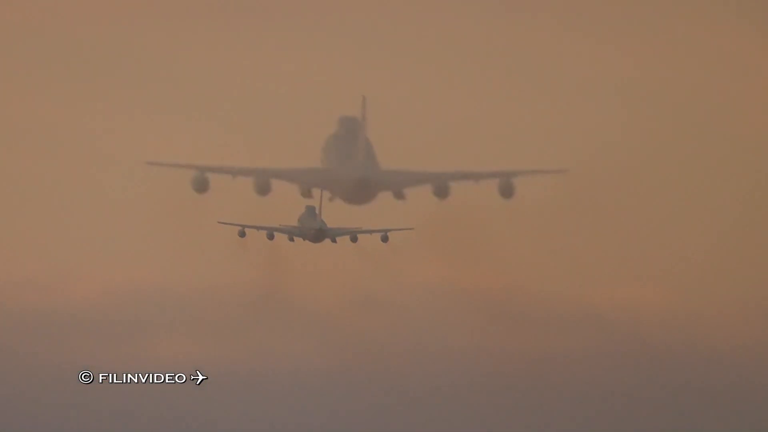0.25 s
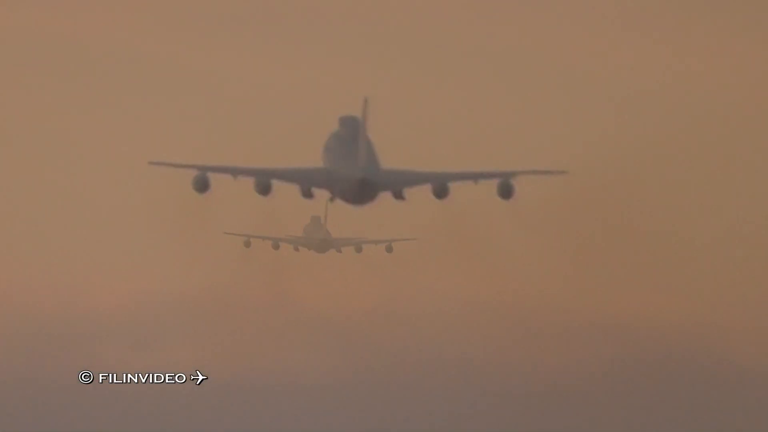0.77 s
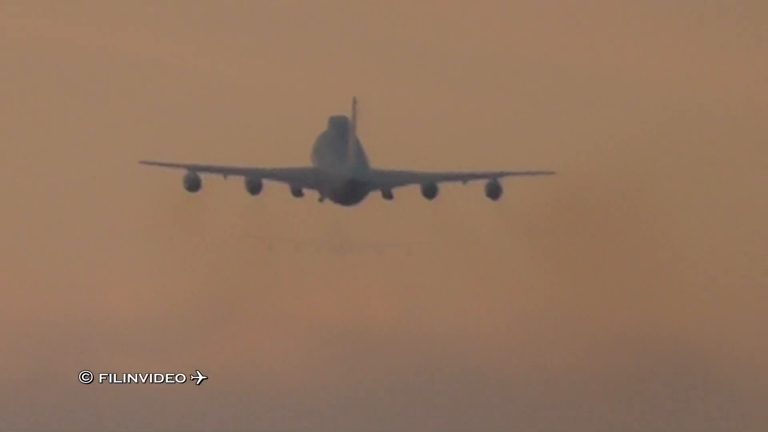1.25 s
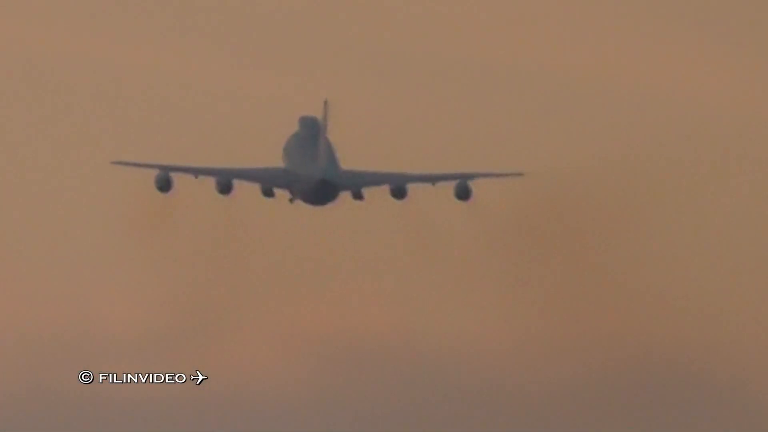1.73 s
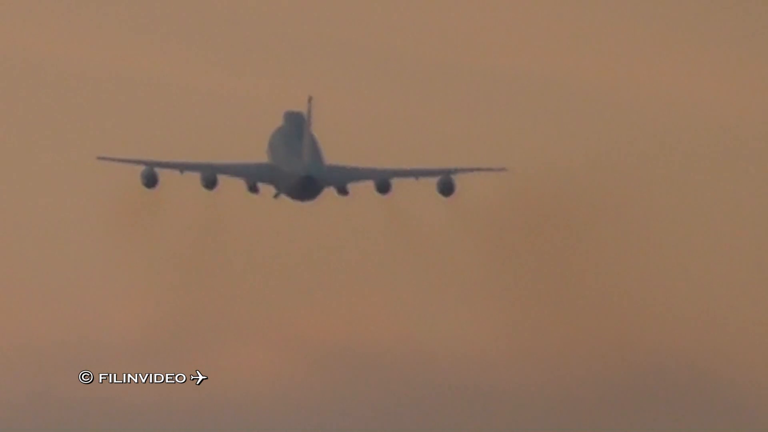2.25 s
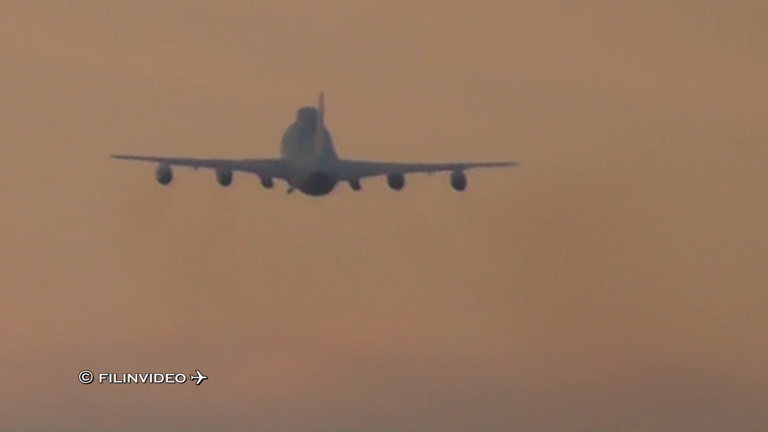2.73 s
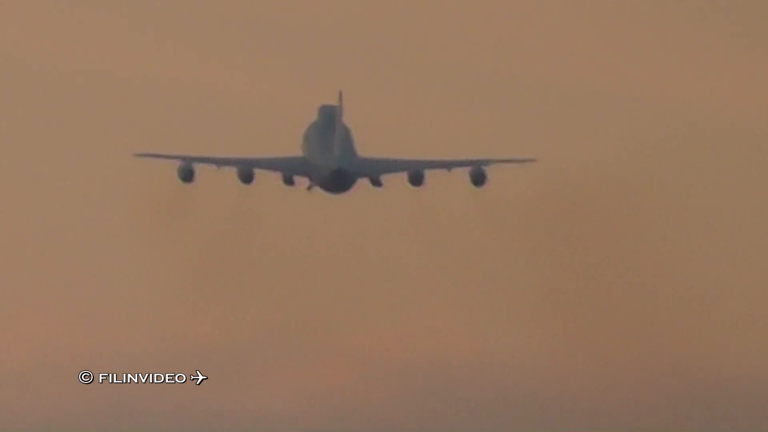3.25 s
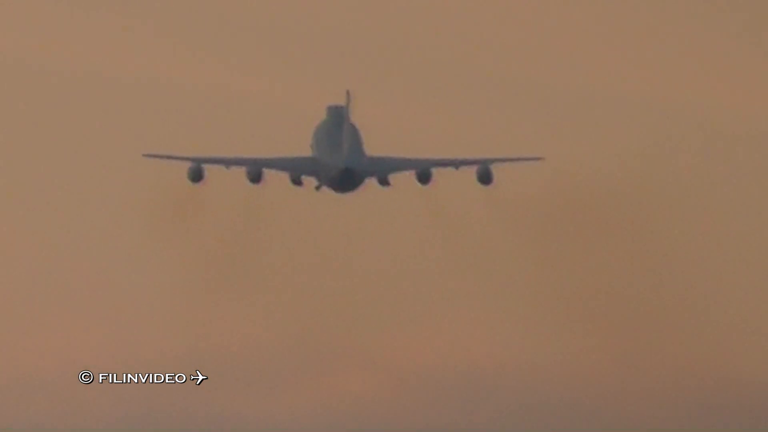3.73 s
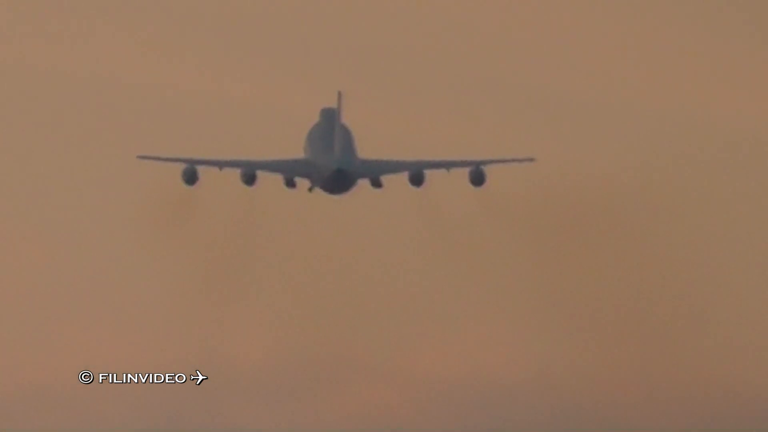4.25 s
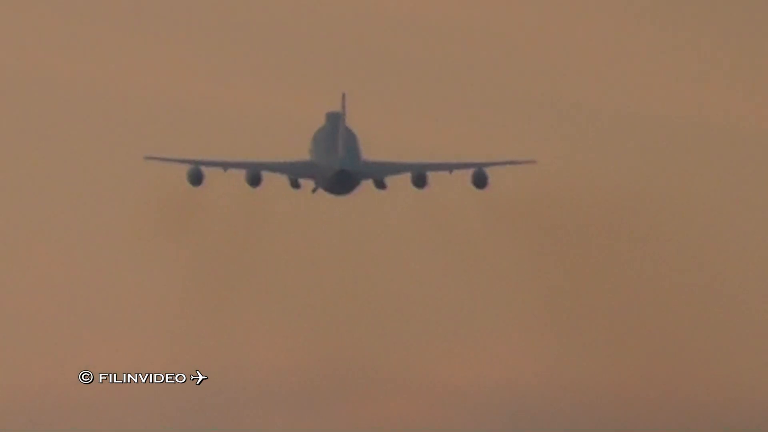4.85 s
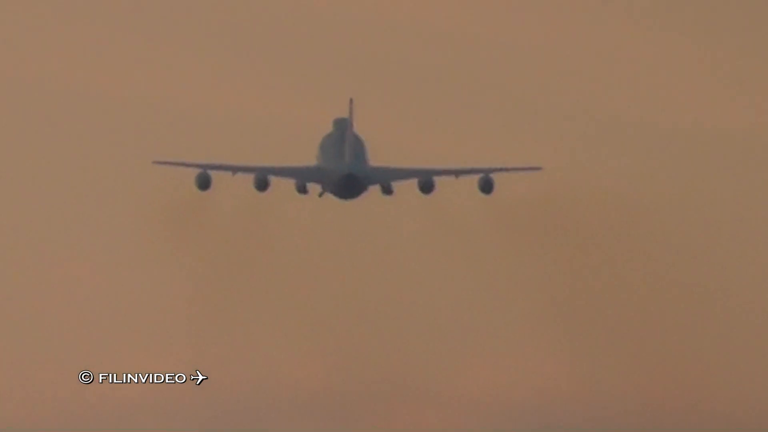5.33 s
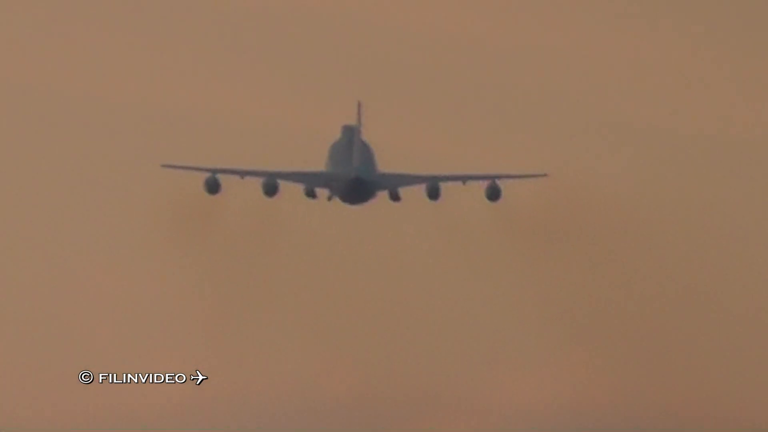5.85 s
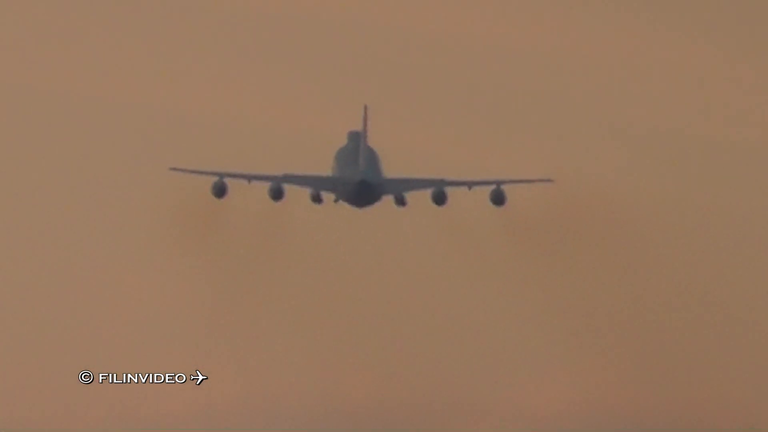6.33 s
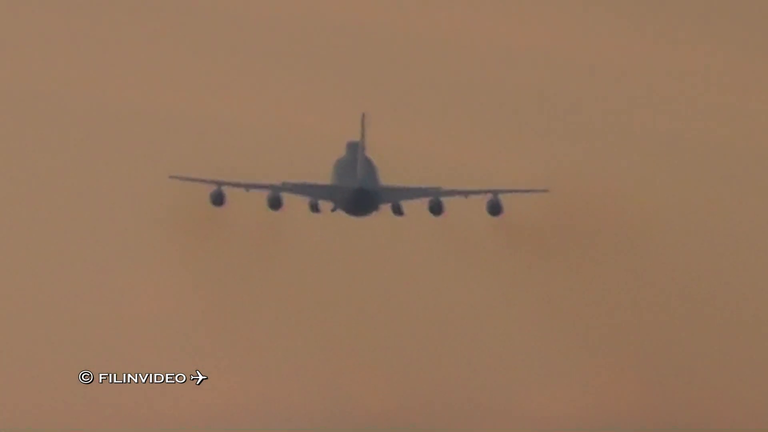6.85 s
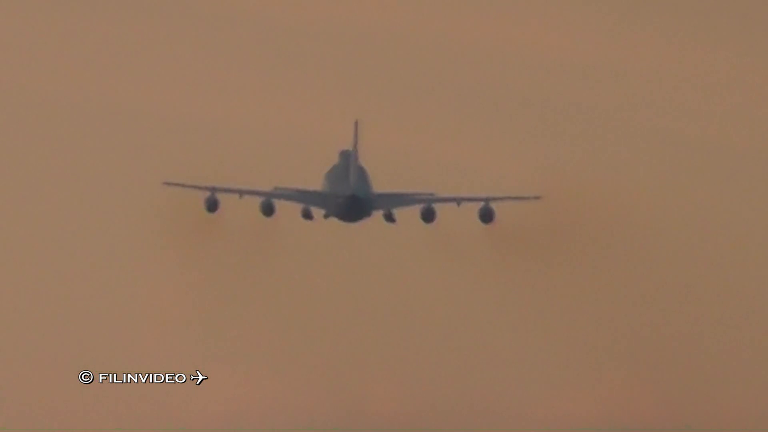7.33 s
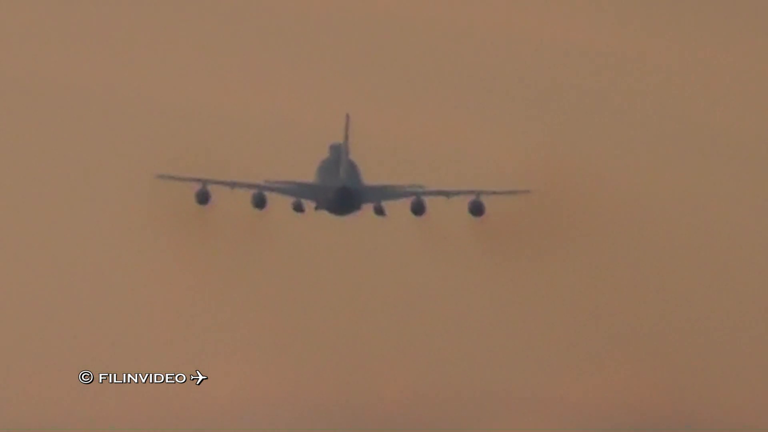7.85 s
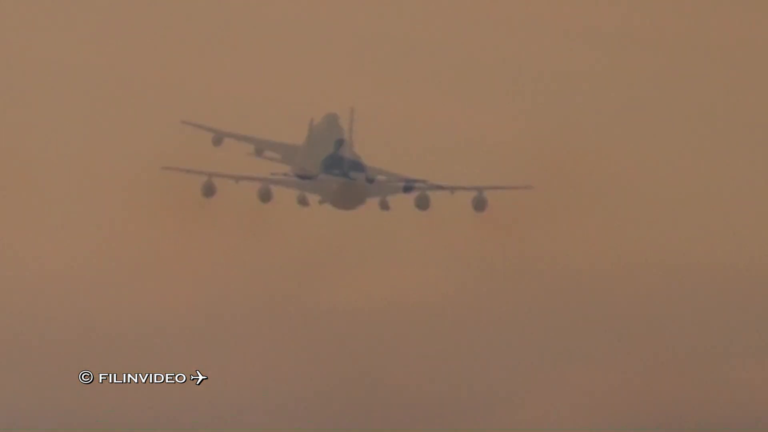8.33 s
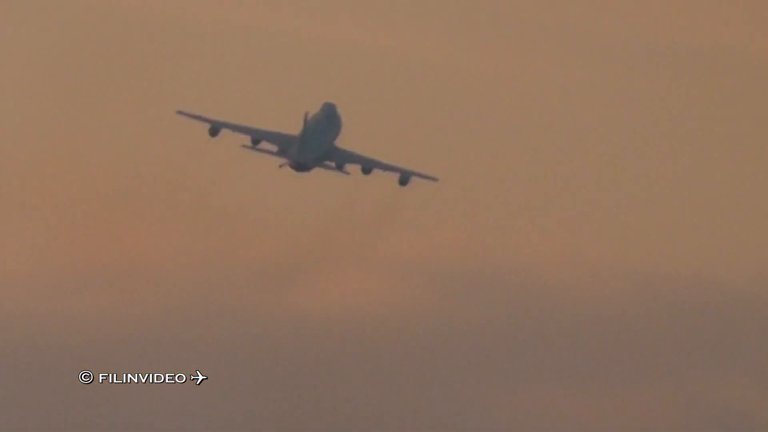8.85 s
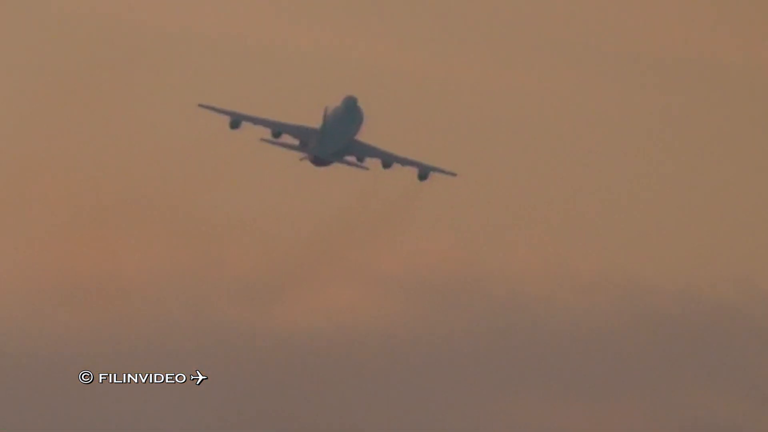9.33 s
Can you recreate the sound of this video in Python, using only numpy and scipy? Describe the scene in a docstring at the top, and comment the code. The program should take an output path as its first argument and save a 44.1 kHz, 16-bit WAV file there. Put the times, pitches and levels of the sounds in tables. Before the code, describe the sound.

Outdoors at an airfield, a four-engine jet climbs away with a deep, wavering rumble whose mid-range rush soon fades. Low wind gusts buffet the stereo camcorder microphone, strongest around four and six seconds, then die down. The camera's rapid ticking whirr, hiss and thin whine run underneath throughout.

```python
"""Jet climbing away in a gusty wind

A four-engine jet climbs away: its exhaust rumble swells and sinks, while its mid-range rush steadily fades.
Gusts of coloured noise buffet the camcorder's stereo microphone and die down towards the end. The tape drum
ticks about 49 times a second and rings the housing; rubbing parts hiss, motor and gears whine. A brief bright
burst comes early, three slaps of wind stand out, and the whole sound dips briefly near the end."""
import sys
import numpy as np
from scipy import signal
from scipy.fft import rfft, irfft, next_fast_len
from scipy.io import wavfile
from scipy.ndimage import uniform_filter1d, minimum_filter1d

SR = 44100
rng = np.random.default_rng(int(sys.argv[2]) if len(sys.argv) > 2 else 0)


def to_wav(sig):
    """Store sig (one row per channel, or 1-D mono) as 16-bit WAV at the path in sys.argv[1].

    Samples outside -1..1 are clipped; the rate is SR.
    """
    pcm = np.clip(np.atleast_2d(sig), -1, 1) * 32767
    pcm = np.round(pcm).astype(np.int16)
    wavfile.write(sys.argv[1], SR, pcm.T)  # frames by channels


N = 422478
TIME = np.arange(N) / SR
OPPOSED = np.array([[1], [-1]])  # left and right in opposite polarity


def from_db(db):
    """Decibels to an amplitude factor."""
    return 10 ** (np.asarray(db) / 20)


def unit_power(x):
    """Scale to unit power."""
    return x / np.sqrt(np.mean(x ** 2) + 1e-20)


def in_time(rows):
    """Each column of a time table, drawn as straight lines through every sample."""
    seconds, *columns = np.transpose(rows)
    return [np.interp(TIME, seconds, column) for column in columns]


def at_hz(points, hz):
    """Read a frequency table on a log-frequency axis."""
    points_hz, values = np.transpose(points)
    return np.interp(np.log(np.maximum(hz, 1)), np.log(points_hz), values)


def colour(x, spectrum, sign=1):
    """Filter by a table of decibels over frequency; sign scales the decibels and may flip them."""
    size = next_fast_len(N + SR // 10)
    gain = from_db(sign * at_hz(spectrum, np.fft.rfftfreq(size, 1 / SR)))
    return irfft(rfft(x, size) * gain, size)[..., :N]


def noise(spectrum):
    """Random noise of unit power with the given colour."""
    return unit_power(colour(rng.standard_normal(N), spectrum))


def drift(rate_hz):
    """Smooth chance of spread 1 that changes about rate_hz times a second."""
    # made at one value per 40 samples, with a lead-in thrown away
    pole = np.exp(-80 * np.pi * rate_hz / SR)
    steps = rng.standard_normal(N // 40 + 2002)
    slow = signal.lfilter([1], [1, -2 * pole, pole * pole], steps)[2000:]
    return np.interp(np.arange(N) / 40, np.arange(len(slow)), unit_power(slow))


def resonate(x, hz, width_hz):
    """One resonance, ringing longer the narrower it is; the output has unit power."""
    pole = np.exp(-np.pi * width_hz / SR)
    feedback = [1, -2 * pole * np.cos(2 * np.pi * hz / SR), pole * pole]
    return unit_power(signal.lfilter([1, 0, -1], feedback, x + 1e-18))


def highs(x, hz):
    """What lies above hz."""
    return signal.sosfilt(signal.butter(2, hz, "high", fs=SR, output="sos"), x)


def pan(left_db):
    """Gains of the two channels, left_db apart."""
    return from_db(OPPOSED * left_db / 2)


def swell(peak_s, length_s):
    """A smooth rise and fall of height 1 around peak_s, length_s wide at half height."""
    return np.exp2(-(2 * (TIME - peak_s) / length_s) ** 2)


def with_swells(steady_db, rows):
    """Level in dB of a steady sound with swells (peak_s, length_s, peak_db) added to its power."""
    power = from_db(steady_db) ** 2
    power = power + sum((from_db(db) * swell(s, length)) ** 2 for s, length, db in rows)
    return 10 * np.log10(power)


def microphone_hiss(own_db=-73, shared_db=-75):
    """Faint random hiss, partly separate in each channel and partly shared; only the treble is kept."""
    own = from_db(own_db) * rng.standard_normal((2, N))
    shared = from_db(shared_db) * rng.standard_normal(N)
    return highs(own + shared, 3000)


# One brief bright burst: start_s, length_s
BURST_TIME = (.598, .016)
# Its bright colour: pitch_hz, relative level_db per Hz
BURST_COLOUR = [(2500, -22), (5000, -3), (8000, 5), (11000, -12), (15500, -17)]


def bright_burst(level_db=-42):
    """A short burst of bright noise under a rounded envelope, a little to the left."""
    start_s, length_s = BURST_TIME
    progress = np.clip((TIME - start_s) / length_s, 0, 1)
    stroke = np.sqrt(np.maximum(np.sin(np.pi * progress), 0))
    return from_db(level_db) * stroke * noise(BURST_COLOUR) * pan(3)


# Speed of the tape drum: time_s, rate in ticks per s
DRUM_SPEED = [(0.0, 48.72), (1.7, 48.83), (3.3, 48.93), (4.7, 49.17), (6.0, 48.91), (7.4, 48.78),
              (8.5, 49.07), (9.58, 48.74)]
FIRST_TICK_S = .017


def drum_turns():
    """Turns of the drum so far; it ticks at each whole number."""
    per_s, = in_time(DRUM_SPEED)
    return 1 + np.cumsum(per_s) / SR - FIRST_TICK_S * per_s[0]


# Housing modes rung by each tick: pitch_hz, width_hz, relative level_db
HOUSING_MODES = [(1665, 49, 7), (1849, 22, -3.5), (1966, 79, 5.5), (2080, 78, 4.5), (3112, 51, 1),
                 (3380, 100, 0), (3627, 65, -3), (3860, 110, -8.5), (4170, 37, -3), (4340, 28, -2.5),
                 (4740, 87, -8.5)]


def ticks(turns, scrape_s=.0011, grit=.47, uneven_db=2.0, soft_hz=6000):
    """Once a turn the drum knocks and scrapes briefly; the housing rings."""
    count = np.floor(turns).astype(int)
    age_s = (turns - count) / np.mean(np.array(DRUM_SPEED)[:, 1])
    strength = from_db(uneven_db * rng.standard_normal(count[-1] + 1))[count]
    knock = unit_power(np.diff(count, prepend=count[0]))
    scrape = unit_power(age_s * np.exp(-age_s / scrape_s) * rng.standard_normal(N))
    push = strength * (knock * (1 - grit) + scrape * grit)
    # the tape cushions the contact
    push = signal.sosfilt(signal.butter(2, soft_hz, fs=SR, output="sos"), push)
    ringing = 0
    for k, (hz, width_hz, db) in enumerate(HOUSING_MODES):
        polarity = (-1) ** k  # modes alternate in polarity
        ringing = ringing + polarity * from_db(db) * resonate(push, hz, width_hz)
    return unit_power(ringing)


# Hiss of rubbing tape and bearings: pitch_hz, relative level_db per Hz
RUB_COLOUR = [(700, -3), (1300, -11.5), (1850, 2.5), (2280, -3.5), (2900, 0), (3850, -2.5), (4400, 0),
              (5250, -8), (7200, -11), (7750, -21), (8400, -16.5), (10300, -30.5), (15500, -49.5)]
# Stereo width of the rubbing: pitch_hz, side minus mid level_db
RUB_WIDTH = [(1300, -0.5), (2300, -7.5), (3200, -11), (4400, -18.5), (6200, -15.5), (8500, -7), (14000, -3)]


def rubbing(turns, pulse_depth=0.68, pulse_turns=0.25, waver_db=1.2):
    """Tape and bearings hiss; the middle comes a little harder after every tick, the sides stay even."""
    pulse = 1 + pulse_depth * np.exp(-(turns % 1) / pulse_turns)
    middle = unit_power(noise(RUB_COLOUR) * pulse * from_db(waver_db * drift(25)))
    return middle + OPPOSED * colour(noise(RUB_COLOUR), RUB_WIDTH)


def turning_tones(tones, flutter_db, wow_share, wow_hz):
    """Tones of turning parts that wander a little in pitch and flutter in level."""
    total = 0
    for hz, db in tones:
        phase = 2 * np.pi * hz * np.cumsum(1 + wow_share * drift(wow_hz)) / SR
        tone = unit_power(np.sin(phase) * from_db(flutter_db * drift(3.6)))
        total = total + from_db(db) * tone
    return total


# Motor tones: pitch_hz, level_db before the trim
MOTOR_TONES = [(1662, -65.5), (1711, -58.5), (1811.5, -51.5), (1913, -55), (1958, -62.5), (2046, -60),
               (2390, -63.5), (2951, -57), (3091, -55), (3277, -63), (3580, -56), (4349, -55.5),
               (4892, -59), (5437, -63)]


def motor(level, trim_db=1.5):
    """The motor whines in steady tones that follow the loudness curve of the mechanism."""
    tones = turning_tones(MOTOR_TONES, flutter_db=3.0, wow_share=0.00199, wow_hz=13.92)
    return from_db(trim_db) * unit_power(level) * tones


# Tones of the two gear groups: pitch_hz, level_db within the group
LOW_GEAR_TONES = [(789.3, -8.5), (812, -11.5), (830.8, 0)]
HIGH_GEAR_TONES = [(917.5, -4.5), (937.4, -1), (969.8, -11.5), (991.1, -8)]
# Swells of the gears: peak_s, length_s, low gear peak_db, high gear peak_db
GEAR_SWELLS = [(1.25, 0.96, -50, -37.5), (2.95, 0.99, -40.5, -40), (4.35, 1.1, -41, -40),
               (6.9, 2.4, -46, -47.5), (8.5, 1.4, -45.5, -53)]
# steady hum of each group
LOW_GEAR_DB, HIGH_GEAR_DB = -52, -45.5


def gears():
    """Two groups of gears hum in wandering tones and swell now and then."""
    low_rows = [(s, length, low) for s, length, low, high in GEAR_SWELLS]
    high_rows = [(s, length, high) for s, length, low, high in GEAR_SWELLS]
    low_db = with_swells(LOW_GEAR_DB, low_rows)
    high_db = with_swells(HIGH_GEAR_DB, high_rows)
    wander = dict(flutter_db=1.8, wow_share=0.001993, wow_hz=3.31)
    low = from_db(low_db) * turning_tones(LOW_GEAR_TONES, **wander)
    high = from_db(high_db) * turning_tones(HIGH_GEAR_TONES, **wander)
    return low + high


# Loudness of the mechanism: time_s, level_db before the trims
MECHANISM_LEVEL = [(0, -41.5), (.9, -41.5), (1.35, -38), (2.4, -39), (3.35, -39), (3.87, -41), (4.13, -37),
                   (4.5, -40), (5.05, -38.5), (5.5, -40), (7.1, -39.5), (7.3, -41.5), (9.58, -42)]


def camcorder(tick_trim_db=-1.0, rub_trim_db=0.7):
    """Ticks, rubbing, motor and gears reach both capsules through the housing."""
    level = from_db(in_time(MECHANISM_LEVEL)[0])
    turns = drum_turns()
    clatter = from_db(tick_trim_db) * ticks(turns) + from_db(rub_trim_db) * rubbing(turns)
    return level * clatter + motor(level) + gears()


# Strength of the steady wind: time_s, level_db before the trim
BREEZE = [(0, -14), (.9, -17), (1.57, -24.5), (1.8, -18), (2.65, -17.5), (3.1, -15), (4.4, -13),
          (5.12, -22), (5.5, -17), (6.3, -19.5), (6.65, -29.5), (7.6, -30.5), (9.58, -40)]
# Gusts that stand out of it, each a smooth swell: peak_s, length_s, peak_db before the trim
GUSTS = [(0.815, 0.18, -12), (1.352, .15, -17.5), (1.852, .07, -16), (1.964, 0.035, -12),
         (2.083, .09, -13.5), (2.219, 0.024, -14), (2.403, 0.065, -14), (2.542, 0.074, -14),
         (2.85, .12, -13.5), (3.09, 0.078, -13.5), (3.827, 0.15, -9.5), (4.121, 0.069, -14),
         (5.249, 0.065, -14.5), (5.61, 0.19, -18.5), (5.931, 0.069, -6.5), (6.197, .07, -14),
         (6.318, 0.088, -15), (7.364, 0.14, -21), (7.5, .07, -17), (7.94, 0.13, -28.5)]
# Buffeting shared by both channels: pitch_hz, relative level_db per Hz
WIND_MID = [(20, -38), (45, -18.5), (70, -9.5), (105, -2.5), (170, 2), (240, -2.5), (320, -8.5), (450, -19),
            (700, -30.5), (1100, -36), (2000, -47), (4000, -81)]
# Buffeting opposed between the channels, on the same scale: pitch_hz, relative level_db per Hz
WIND_SIDE = [(20, -41), (45, -17), (70, -20), (105, -5.5), (170, -5.5), (240, -7), (330, -8.5), (500, -16),
             (750, -21), (1150, -26.5), (1600, -38), (2500, -53), (4500, -79)]


def wind(eddy_db=2.5, eddies_hz=25, trim_db=-0.83, split_hz=280, shared=.62, brightening=0.89, flutter_db=2.5):
    """Eddies sweep over the left port first, so their upper part comes out opposed between the channels."""
    gust_db = with_swells(in_time(BREEZE)[0], GUSTS)
    pressure = signal.hilbert(rng.standard_normal(N), next_fast_len(N))[:N]
    # the pressure gradient across the ports runs a quarter cycle ahead of the pressure
    gradient = -shared * pressure.imag + np.sqrt(1 - shared ** 2) * rng.standard_normal(N)
    mid = colour(pressure.real, WIND_MID)
    side = colour(gradient, WIND_SIDE)
    buffet = (mid + OPPOSED * side) / np.std(mid)
    upper = signal.sosfiltfilt(signal.butter(2, split_hz, "high", fs=SR, output="sos"), buffet)
    # a harder wind sheds more small eddies, which come in quick bursts
    smooth_db = uniform_filter1d(gust_db, size=SR // 4)
    brighter_db = brightening * (smooth_db - np.percentile(smooth_db, 80))
    flutter = from_db(brighter_db + flutter_db * drift(83))
    level = from_db(gust_db + trim_db + eddy_db * drift(eddies_hz))
    return level * (buffet + upper * (flutter - 1))


# Eddies that slap the ports: peak_s, level_db
SLAPS = [(4.118, -26), (4.33, -29.5), (5.93, -20)]
# Their colour: pitch_hz, relative level_db per Hz
SLAP_COLOUR = [(120, -25), (300, -2), (550, -2), (1100, -6.5), (1700, -19), (3500, -48), (7000, -88)]


def slaps(length_s=0.018):
    """Short, brighter bursts of buffeting, with separate noise at each port."""
    burst = sum(from_db(db) * np.exp(-((TIME - s) / length_s) ** 2) for s, db in SLAPS)
    return burst * np.array([noise(SLAP_COLOUR) for port in range(2)])


# Rumble of the jet: time_s, level_db
JET_LEVEL = [(0, -22.5), (.4, -28), (1.6, -22.5), (3.3, -25), (6.8, -24.5), (9.58, -28)]
# Exhaust noise after its way through the air: pitch_hz, relative level_db per Hz
EXHAUST_COLOUR = [(20, -45), (45, -11), (70, -8.5), (100, 2.5), (135, 1.5), (210, 0), (300, -5.5),
                  (420, -9.5), (650, -10.5), (900, -18.5), (1300, -22.5), (2200, -36), (4000, -62.5)]
# Stereo width of the jet: pitch_hz, side minus mid level_db
JET_WIDTH = [(50, -9), (110, -20.5), (200, -19), (370, -14), (570, -8.5), (1000, -5), (2000, -8.5)]
# mid-range rush, where the ground echo adds to the jet; it dies away as the jet climbs
RUSH_START_DB, RUSH_FADE_DB_PER_S, RUSH_HZ = -27.5, 7, 550


def jet(waver_db=0.58, rush_width_hz=95):
    """Exhaust noise; turbulent air on the long path makes it swell and sink."""
    level_db, = in_time(JET_LEVEL)
    rumble = noise(EXHAUST_COLOUR) + OPPOSED * colour(noise(EXHAUST_COLOUR), JET_WIDTH)
    # a narrow band of noise: two slow drifts ride a cosine and a sine
    turn = 2 * np.pi * RUSH_HZ * TIME
    rush = unit_power(drift(rush_width_hz) * np.cos(turn) + drift(rush_width_hz) * np.sin(turn))
    rush_db = RUSH_START_DB - RUSH_FADE_DB_PER_S * TIME
    return from_db(level_db + waver_db * drift(2.3)) * rumble + from_db(rush_db) * rush


# the whole sound dips briefly
DIP_S, DIP_LENGTH_S, DIP_DB = 8.34, 0.37, -3


def scene():
    """Hiss, a brief burst, camcorder, wind and jet together; everything dips once near the end."""
    dip = from_db(DIP_DB * swell(DIP_S, DIP_LENGTH_S))
    return dip * (microphone_hiss() + bright_burst() + camcorder() + wind() + slaps() + jet())


# squeeze is the share by which what rises above the threshold is turned down
THRESHOLD_DB, SQUEEZE, LISTEN_S = -12.5, 0.5, .06


def gain_control(x):
    """Strong gusts turn the gain down, so the whirr ducks under them."""
    power = uniform_filter1d(np.mean(x ** 2, axis=0), size=int(LISTEN_S * SR))
    over_db = np.maximum(10 * np.log10(power + 1e-12) - THRESHOLD_DB, 0)
    return x * from_db(-SQUEEZE * uniform_filter1d(over_db, size=SR // 50))


# Colour difference of the two capsules: pitch_hz, left minus right level_db
CAPSULES = [(55, -1), (100, 2), (165, 2), (250, -1.5), (370, -4), (570, -2), (850, -2), (1300, 0),
            (1900, -1.5), (2900, -1.5), (4200, 0), (9000, -1.5), (14000, 0.5)]
CUTOFF_HZ = 15760


def record(dry):
    """Capsules colour the sound, gain rides the gusts, a fast limiter tames peaks, and the top is cut."""
    heard = gain_control(colour(highs(dry, 22), CAPSULES, sign=OPPOSED / 2))
    # the limiter takes the lowest allowed gain nearby, then smooths it
    allowed = 1 / np.maximum(np.abs(heard).max(axis=0), 1)
    gain = uniform_filter1d(minimum_filter1d(allowed, size=SR // 200), size=SR // 200)
    top_cut = signal.ellip(10, .1, 80, CUTOFF_HZ, fs=SR, output="sos")
    return signal.sosfilt(top_cut, heard * gain)


dry = scene()
out = record(dry)
to_wav(out)
```